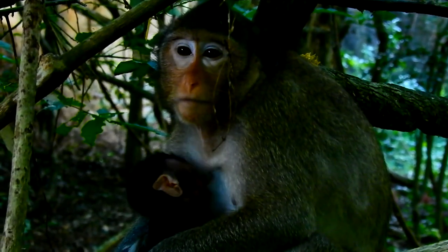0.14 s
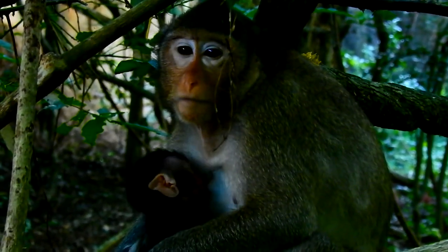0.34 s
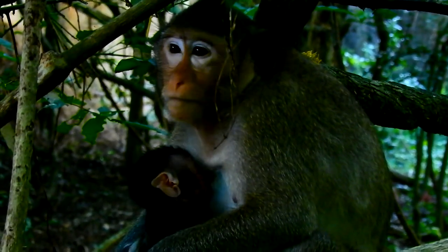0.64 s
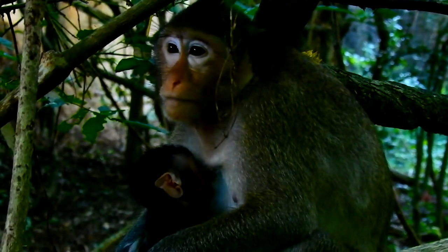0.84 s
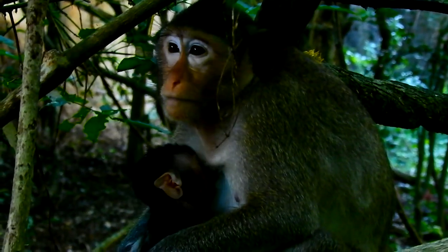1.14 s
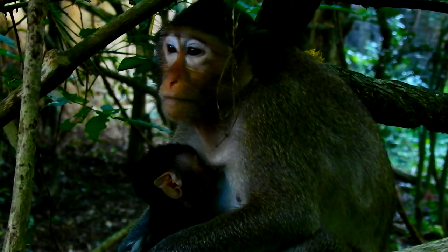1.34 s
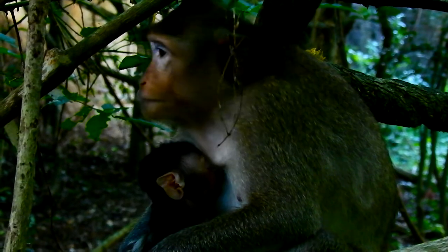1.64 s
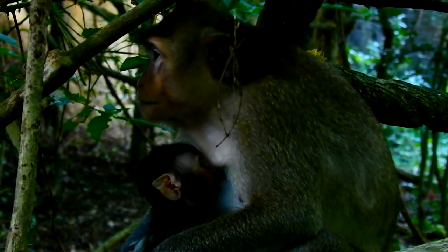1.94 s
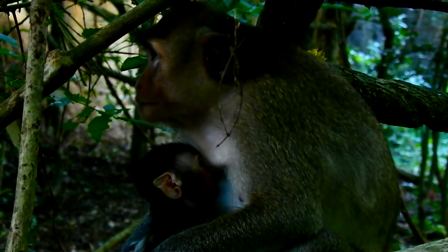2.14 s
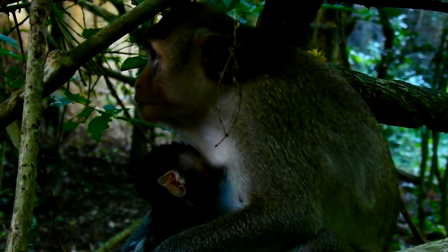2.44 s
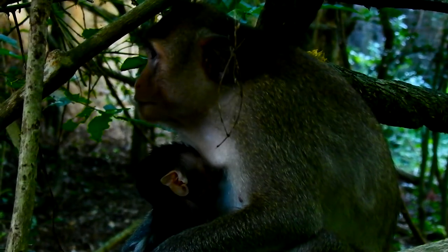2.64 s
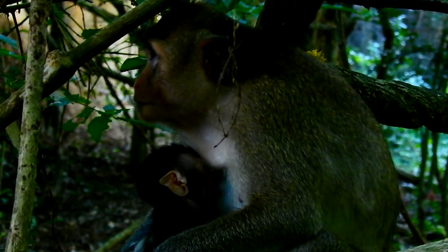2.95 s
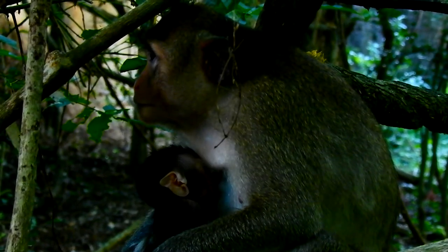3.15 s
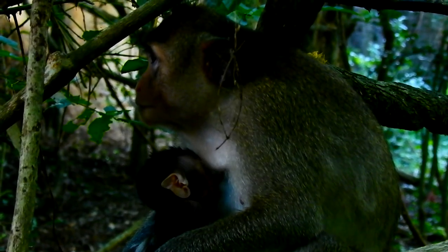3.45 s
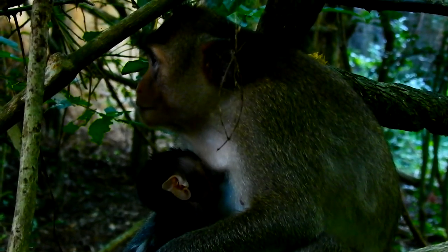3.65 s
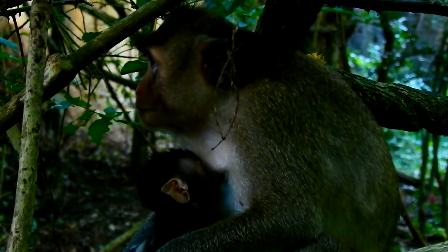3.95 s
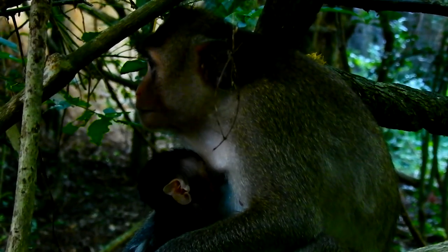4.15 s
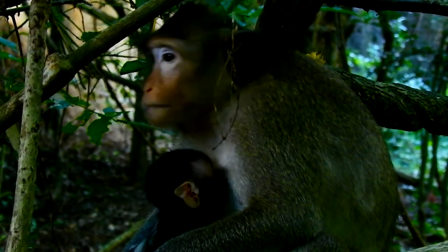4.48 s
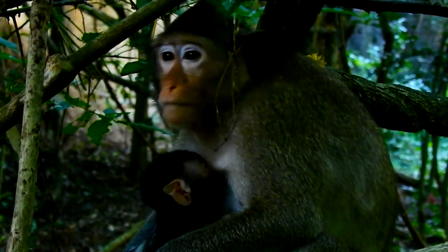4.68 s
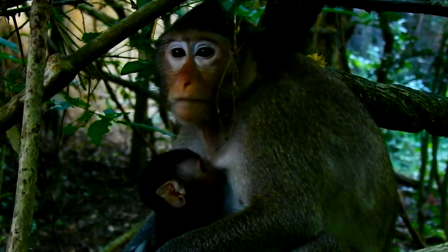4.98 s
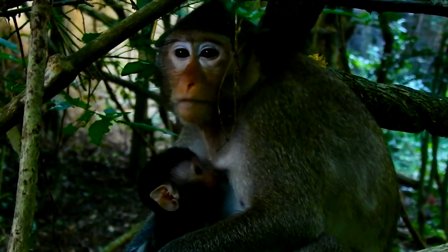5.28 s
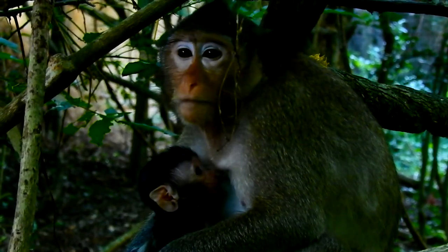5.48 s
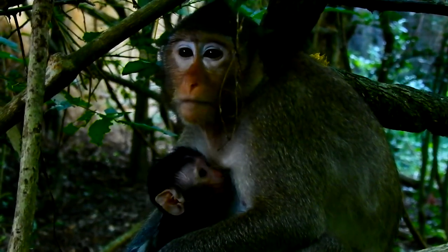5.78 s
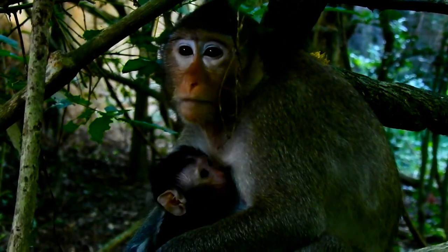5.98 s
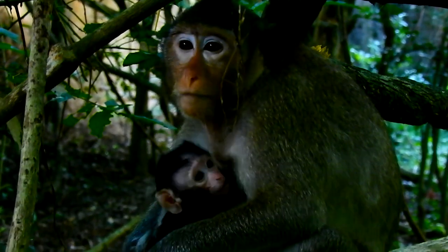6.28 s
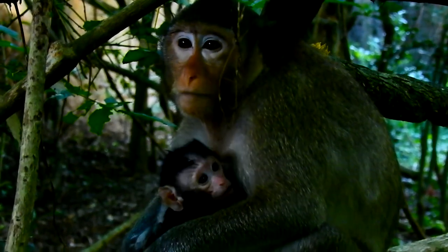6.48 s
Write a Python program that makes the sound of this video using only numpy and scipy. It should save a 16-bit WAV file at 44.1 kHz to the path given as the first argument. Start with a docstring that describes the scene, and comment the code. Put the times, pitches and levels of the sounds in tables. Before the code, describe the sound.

A monkey coos once, its voice falling and cracking, amid pulsing insects, rustling leaves and faint bird whistles in a forest.

```python
"""Monkey coo in a forest

A young monkey gives one two-part coo: vocal-fold harmonics shaped by throat and mouth. As the pitch
falls, a slower vibration in the larynx cracks it into a rasp. Insects drone in bands around their body
resonances; near ones chirp about five times a second over a low rumble. Leaves rustle, branches
knock, a twig snaps and distant birds whistle faintly."""
import sys
import numpy as np
from scipy import signal
from scipy.fft import rfft, irfft, next_fast_len
from scipy.io import wavfile

SR = 44100
rng = np.random.default_rng(int(sys.argv[2]) if len(sys.argv) > 2 else 0)


def persist_wave(psi):
    """Save psi, clipped to +-1, as 16-bit WAV."""
    counts = np.round(np.clip(psi, -1, 1) * 32767).astype(np.int16)
    wavfile.write(sys.argv[1], SR, np.atleast_2d(counts).T)


N = 291920

# rumble and forest air: f/Hz, relative density/dB
AIR_SPECTRUM = [(20, -40), (35, -13), (60, 0), (120, 0.5), (180, -7.5), (260, -16.5), (500, -21),
                (1000, -24), (2200, -26.5), (7000, -24.5), (9000, -28), (10800, -31), (12000, -40.5),
                (16000, -45)]
# f/Hz, left-right correlation
AIR_CORRELATION = [(60, 0.99), (130, 0.98), (290, 0.77), (700, 0.64), (3000, 0.39), (7000, 0.48),
                   (10000, -0.44), (15000, 0.17)]
# echo decay among the trees: f/Hz, T60/s
FOREST_T60 = [(300, 0.43), (1500, 0.26), (5000, 0.2), (12000, 0.048)]
# steady insect bands: f/Hz, width/Hz, level/dB, left-right correlation, flutter/dB
HIGH_BANDS = [(4632, 410, -46.5, 0.71, 3.5), (5380, 1100, -48, 0.57, -0.5), (6731, 577, -40.5, 0.11, 1)]
# body resonances of the lower insects: f/Hz, width/Hz, relative level/dB
LOW_BANDS = [(3028, 370, -2), (3410, 390, 2.5)]
# their slow swells: crest t/s, length/s, level/dB
LOW_SWELLS = [(.25, 1.4, -51.5), (1.34, 0.89, -49.5), (2.42, 0.97, -51), (3.55, .55, -51), (5.0, 2.4, -51),
              (6.3, .5, -51.5)]
# bird notes: t/s, length/s, start f/Hz, end f/Hz, level/dB
BIRD_NOTES = [(0.13, .17, 3920, 3940, -56), (.442, .16, 3940, 3940, -55), (0.741, 0.27, 1260, 1240, -57.5),
              (1.03, .16, 1270, 1300, -64), (1.07, 0.065, 3790, 3820, -50), (1.124, 0.2, 3930, 3970, -56),
              (1.695, .13, 3950, 3920, -50.5), (2.46, 0.12, 985, 967, -60), (3.0, .28, 1210, 1340, -63),
              (5.06, 0.059, 3860, 3780, -46.5), (5.14, 0.066, 1516, 1466, -58)]
# leaf rustles: crest t/s, length/s, level/dB
LEAF_SWELLS = [(0.224, 0.3, -42), (0.502, 0.23, -50.5), (1.418, 0.24, -42), (1.8, 0.32, -54),
               (2.712, 0.24, -46), (3.447, 0.18, -45), (3.978, 0.16, -47.5), (4.316, 0.34, -44),
               (4.81, 0.28, -47), (5.16, 0.16, -49.5), (5.959, 0.26, -48.5)]
# f/Hz, relative density/dB
LEAF_SPECTRUM = [(150, 5.5), (400, -7), (1200, -2), (2300, -3.5), (4000, -5.5), (5800, 3), (7200, 5.5),
                 (8500, -6.5), (11000, -21), (16000, -45)]
# knocks on branches and ground: t/s, level/dB, f/Hz, decay/s
THUDS = [(.38, -39.5, 420, 0.012), (1.375, -41.5, 590, 0.027), (1.48, -50, 420, 0.054),
         (1.915, -44.5, 700, 0.0089), (2.417, -45, 279, 0.03), (2.436, -33.5, 175, 0.023),
         (3.411, -47.5, 550, .04), (3.935, -39, 597, 0.0084), (4.018, -40, 850, 0.007),
         (5.871, -52, 342, 0.16)]
# twig cracks: t/s, level before filtering/dB, decay/s
TWIG_CRACKS = [(3.945, -14.5, 0.0029), (3.955, -21, .016)]
# runs of near chirps: first t/s, last t/s, relative level/dB, f/Hz
NEAR_RUNS = [(.136, .707, -26.3, 4610), (.165, .612, -32, 4930), (.879, 1.445, -25.2, 4690),
             (1.116, 1.496, -32, 4780), (1.633, 2.395, -26, 4650), (2.61, 2.61, -25.3, 4630),
             (2.637, 3.294, -31.5, 4980), (2.856, 3.229, -26, 4600), (3.391, 4.144, -26.4, 4650),
             (4.342, 4.954, -26.3, 4670), (5.141, 5.708, -26.8, 4690), (5.953, 6.501, -25.3, 4720)]
# monkey's throat and mouth response: f/Hz, gain/dB
VOCAL_TRACT = [(300, -65), (600, -15.5), (740, -5.5), (900, -2), (1200, -0.5), (1500, -5.5), (1800, -6),
               (2070, 2.5), (2350, -12), (2700, -29), (4800, -35), (5850, -16), (6320, -3.5), (7100, -30),
               (8200, -33), (10000, -78)]
# short coo, long coo, weak end: start t/s, end t/s, effort/dB, attack/s, release/s
COO_SYLLABLES = [(4.25, 4.373, -26.5, .04, 0.026), (4.382, 4.872, -31, 0.022, .022),
                 (4.859, 4.986, -37.5, .015, .015)]
# pitch of each coo: t/s, f/Hz
SHORT_COO_PITCH = [(4.25, 730), (4.285, 803), (4.335, 839), (4.37, 774)]
LONG_COO_PITCH = [(4.388, 770), (4.42, 908.5), (4.51, 898), (4.6, 899), (4.68, 885), (4.73, 859),
                  (4.85, 765), (4.985, 642)]
# mouth opening and closing: t/s, overtone gain/dB
MOUTH_OPENING = [(4.4, -23), (4.425, -7), (4.46, 0.5), (4.55, 4.5), (4.73, -1), (4.85, -7.5), (4.93, -14)]


def amp(db):
    """Decibels to gain."""
    return 10 ** (np.asarray(db) / 20)


def unit(x):
    """Scales to rms 1."""
    return x / np.sqrt(np.mean(x ** 2) + 1e-20)


def lookup(points, hz):
    """Interpolates on a log-frequency axis."""
    f, value = np.transpose(points)
    return np.interp(np.log(hz + 1), np.log(f + 1), value)


def add(mix, at_s, sound):
    """Mixes a sound in."""
    part = mix[..., max(round(at_s * SR), 0):][..., :sound.shape[-1]]
    part += sound[..., :part.shape[-1]]


def colour(x, gain):
    """Filters by gain(f)."""
    size = next_fast_len(x.shape[-1])
    return irfft(rfft(x, size) * gain(np.fft.rfftfreq(size, 1 / SR)), size)[..., :x.shape[-1]]


def drift(rate_hz, size=N):
    """Smooth random motion, rms 1."""
    return unit(colour(rng.standard_normal(size), lambda f: np.exp(-(f / rate_hz) ** 2) * (f > 0)))


def stereo_noise(correlation):
    """White noise with left-right correlation(f)."""
    common, apart = rng.standard_normal((2, N))
    common = colour(common, lambda f: np.sqrt(np.clip(1 + correlation(f), 0, 2) / 2))
    apart = colour(apart, lambda f: np.sqrt(np.clip(1 - correlation(f), 0, 2) / 2))
    return np.array([common + apart, common - apart])


def pan(x, left_db):
    """Sets left over right by left_db."""
    return x * amp([[left_db / 2], [-left_db / 2]])


def gate(t, start_s, end_s, attack_s, release_s):
    """Trapezoid envelope, 0 to 1."""
    return np.clip(np.minimum((t - start_s) / attack_s, (end_s - t) / release_s), 0, 1)


def swells(rows):
    """One Gaussian gain hump per row."""
    t = np.arange(N) / SR
    return np.array([amp(db) * np.exp(-(2 * (t - at_s) / length_s) ** 2) for at_s, length_s, db in rows])


def forest_echo(x, wet_db, echoes_per_s=2000, predelay_s=.004):
    """Trunks and leaves scatter sparse echoes to each side; treble dies first."""
    t = np.arange(SR // 2) / SR
    taps = rng.standard_normal((2, len(t)))
    taps *= (rng.random(taps.shape) < echoes_per_s / SR) * (t > predelay_s)
    hz, frame_s, spectra = signal.stft(taps, SR, nperseg=256)
    decay = amp(-60 * frame_s / lookup(FOREST_T60, hz)[:, None])
    tail = signal.istft(spectra * decay, SR)[1]
    tail /= np.linalg.norm(tail, axis=1, keepdims=True)
    return amp(wet_db) * signal.oaconvolve(x[None], tail, axes=1)[:, :N]


def air(db=-45, swell_db=.73, crossover_hz=300):
    """Gently swelling, near-mono rumble under a steady thin hiss."""
    noise = stereo_noise(lambda f: lookup(AIR_CORRELATION, f))
    wash = unit(colour(noise, lambda f: amp(lookup(AIR_SPECTRUM, f))))
    bass = colour(wash, lambda f: 1 / (1 + (f / crossover_hz) ** 4))
    rumble = amp(swell_db * drift(4.9)) * pan(bass, left_db=2.05)
    return amp(db) * (wash - bass + rumble)


def insect_band(hz, width_hz, correlation):
    """Many insects blur into noise around their body resonance."""
    noise = stereo_noise(lambda f: correlation)
    return unit(colour(noise, lambda f: (1 + ((f - hz) / width_hz) ** 2) ** -2))


def high_insects(swell_db=.64):
    """Continuous drones that flutter in level."""
    out = np.zeros((2, N))
    for hz, width_hz, db, correlation, flutter_db in HIGH_BANDS:
        gain = amp(db + flutter_db * np.tanh(drift(60)) + swell_db * drift(4))
        out += gain * insect_band(hz, width_hz, correlation)
    return out


def low_insects(floor_db=-53.5, correlation=.83):
    """A lower drone in slow waves, slightly left."""
    gain = np.sqrt(amp(floor_db) ** 2 + (swells(LOW_SWELLS) ** 2).sum(0))
    drone = sum(amp(db) * insect_band(hz, width_hz, correlation) for hz, width_hz, db in LOW_BANDS)
    return pan(gain * unit(drone), left_db=2)


def birds(waver=.006):
    """Soft, nearly pure whistles from far off."""
    out = np.zeros(N)
    for at_s, length_s, start_hz, end_hz, db in BIRD_NOTES:
        size = round(length_s * SR)
        hz = np.linspace(start_hz, end_hz, size) * (1 + waver * drift(40, size))
        add(out, at_s, amp(db) * np.hanning(size) * np.sin(2 * np.pi * np.cumsum(hz) / SR))
    return out + forest_echo(out, wet_db=-2.5)


def leaves(grain_db=3.5, clump_db=2):
    """Brushed foliage: swells of fine crackle."""
    noise = stereo_noise(lambda f: .4)
    crackle = noise * amp(grain_db * np.tanh(drift(170)) + clump_db * np.tanh(drift(15)))
    rustle = unit(colour(crackle, lambda f: amp(lookup(LEAF_SPECTRUM, f))))
    return swells(LEAF_SWELLS).sum(0) * rustle


def branch_bumps(offset_db=-14, hz=400, decay_s=.038):
    """Each rustle jostles two branches; rows as in THUDS."""
    return [(at_s + length_s * (when - .5) / 2, db + offset_db, hz * 2 ** (pitch - .5), decay_s)
            for at_s, length_s, db in LEAF_SWELLS for when, pitch in rng.random((2, 2))]


def knocks(rise_s=.005):
    """Dull, ringless bumps of moving animals."""
    out, t = np.zeros(N), np.arange(SR // 3) / SR
    for at_s, db, hz, decay_s in THUDS + branch_bumps():
        thud = unit(colour(rng.standard_normal(len(t)), lambda f: (f / hz) ** 2 / (1 + (f / hz) ** 5)))
        add(out, at_s, amp(db) * thud * np.minimum(t / rise_s, 1) * np.exp(-t / decay_s))
    return out + forest_echo(out, wet_db=-28)


def twig(hz=5500, width_hz=3000):
    """A twig snaps: two bright cracks, then echoes."""
    out, t = np.zeros(N), np.arange(SR // 10) / SR
    for at_s, db, decay_s in TWIG_CRACKS:
        add(out, at_s, amp(db) * rng.standard_normal(len(t)) * np.exp(-t / decay_s))
    out = colour(out, lambda f: (1 + ((f - hz) / width_hz) ** 2) ** -4)
    return out + forest_echo(out, wet_db=-5)


def chirp_plan(gap_s=.2, scatter_db=.5, scatter_hz=45):
    """Even pacing within each run: t/s, relative level/dB, f/Hz."""
    return [(at_s, db + scatter_db * rng.standard_normal(), hz + scatter_hz * rng.standard_normal())
            for first_s, last_s, db, hz in NEAR_RUNS
            for at_s in np.linspace(first_s, last_s, round(abs(last_s - first_s) / gap_s) + 1)]


def chirp(nominal_s, centre_hz, sweep_hz=760, detune=.0092, roughness=.23):
    """One insect stroke: a quick downsweep that starts sharply and fades."""
    size = round(nominal_s * rng.uniform(.78, 1.224) * SR)
    progress = np.linspace(0, 1, size)
    hz = (centre_hz + sweep_hz * (.5 - progress)) * (1 + detune * rng.standard_normal())
    envelope = np.minimum(progress / .18, 1) * np.sqrt(1 - progress)
    return envelope * (1 + roughness * drift(370, size)) * np.sin(2 * np.pi * np.cumsum(hz) / SR)


def far_chirps(plan, rms_db=-48.5, hz=4880, min_lag_s=.016, max_lag_s=.13, spread_db=7):
    """Two neighbours deeper in the trees answer each near chirp."""
    out = np.zeros(N)
    for at_s, *_ in plan:
        for lateness, strength in rng.random((2, 2)):
            lag_s = min_lag_s + lateness * (max_lag_s - min_lag_s)
            add(out, at_s + lag_s, amp(spread_db * strength) * chirp(.0129, hz))
    return amp(rms_db) * unit(out + forest_echo(out, wet_db=3))


def near_chirps(plan, gain_db=-1.47, lead_s=.0125, opening_s=.006, stroke_s=.01076):
    """Near insects: a short, uneven opening stroke leads each full stroke."""
    out = np.zeros(N)
    for at_s, db, hz in plan:
        opening_db = db - 2.5 + rng.uniform(-2, 2)
        add(out, at_s - lead_s, amp(opening_db) * chirp(opening_s, hz))
        add(out, at_s, amp(db) * chirp(stroke_s, hz))
    return amp(gain_db) * (pan(out, left_db=-.5) + forest_echo(out, wet_db=-4.5))


def coo_controls(t, crack_s=4.608, rasp_end_s=4.8, free_flap_hz=368, lock_s=.15, full_voice_hz=904):
    """The larynx's slow flap locks to a third of the pitch; the voice cracks and stays airy."""
    hz = np.interp(t, *np.transpose(SHORT_COO_PITCH + LONG_COO_PITCH))
    unlocked = np.sqrt(np.clip((crack_s - t) / lock_s, 0, 1))
    flap_hz = unlocked * free_flap_hz + (1 - unlocked) * hz / 3
    attack_s = .019
    rasping = gate(t, crack_s, rasp_end_s, attack_s, release_s=.051)
    cracked = np.clip((t - crack_s) / attack_s, 0, 1)
    sunk_octaves = np.log2(full_voice_hz / hz)
    effort = sum(amp(db) * gate(t, start_s, end_s, *ramps_s)
                 for start_s, end_s, db, *ramps_s in COO_SYLLABLES)
    effort *= amp(-18 * sunk_octaves - 1.2 * rasping)  # low pitch and rasp weaken the voice
    mouth_db = np.interp(t, *np.transpose(MOUTH_OPENING))
    rasp = amp(-27.5 + mouth_db / 2) + amp(-6.5) * rasping
    breath = amp(-16 + mouth_db / 2) + amp(-10) * cracked
    return hz, flap_hz, sunk_octaves, effort, mouth_db, rasp, breath


def breath_hiss(size, highpass_hz=4500):
    """Air rushing through the mouth excites mainly the upper resonance."""
    def response(f):
        return amp(.69 * lookup(VOCAL_TRACT, f)) * f ** 3 / (f ** 3 + highpass_hz ** 3)
    return unit(colour(rng.standard_normal(size), response))


def monkey(jitter=.0038, rasp_jitter=.0083, shimmer=.073, rasp_shimmer=.32):
    """Vocal folds sound through the throat; a slower flap puts sidebands around each harmonic."""
    t = np.arange(COO_SYLLABLES[0][0], COO_SYLLABLES[-1][1], 1 / SR)
    hz, flap_hz, sunk_octaves, effort, mouth_db, rasp, breath = coo_controls(t)
    waver = 1 + (jitter + rasp_jitter * rasp) * drift(113, len(t))
    voice = np.zeros(len(t))
    for k in range(1, 11):
        # loose folds and sinking pitch dull the upper harmonics
        dull_db = -7 * rasp * (k > 4) - 17 * sunk_octaves * (k > 2)
        for side in (-1, 0, 1):
            tone_hz = (k * hz + side * flap_hz) * waver
            tract_db = lookup(VOCAL_TRACT, tone_hz) + mouth_db * np.clip(tone_hz / hz - 1, 0, 1)
            gain = amp(tract_db + dull_db) * (rasp if side else 1)
            flicker = 1 + (rasp_shimmer if side else shimmer * np.sqrt(k)) * drift(65, len(t))
            voice += gain * flicker * np.cos(2 * np.pi * (np.cumsum(tone_hz) / SR + rng.random()))
    out = np.zeros(N)
    add(out, t[0], effort * (np.sqrt(2) * voice + breath * breath_hiss(len(t))))
    return pan(out, left_db=-11) + forest_echo(out, wet_db=-16)


def scene():
    """Stereo forest mix."""
    plan = chirp_plan()
    insects = high_insects() + low_insects() + near_chirps(plan) + far_chirps(plan)
    return air() + insects + monkey() + leaves() + knocks() + twig() + birds()


def record(dry):
    """Low-pass at 15.8 kHz."""
    lowpass = signal.firwin(511, 15800, window=("kaiser", 9), fs=SR)
    return signal.oaconvolve(dry, lowpass[None], "same")


dry = scene()
out = record(dry)
persist_wave(out)
```